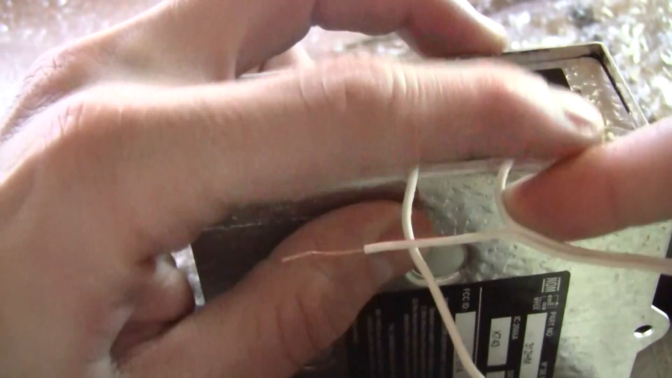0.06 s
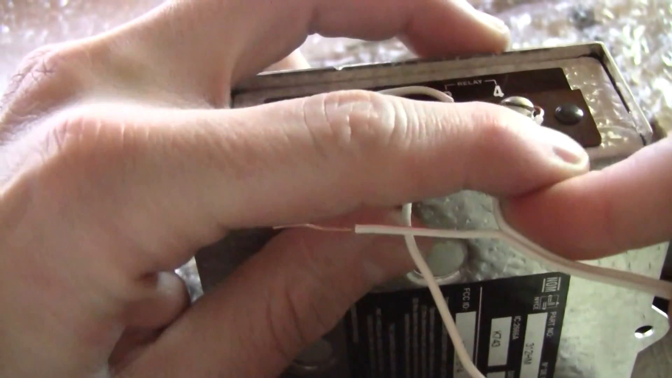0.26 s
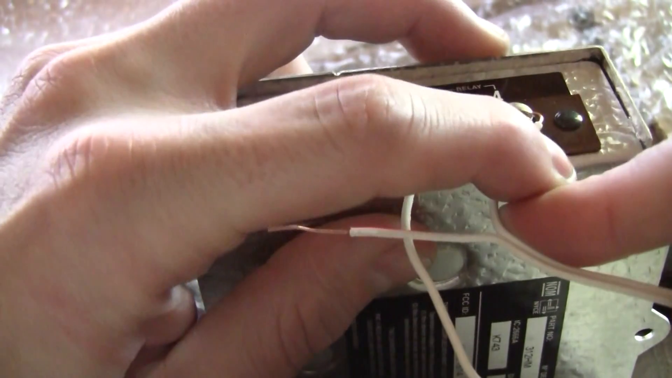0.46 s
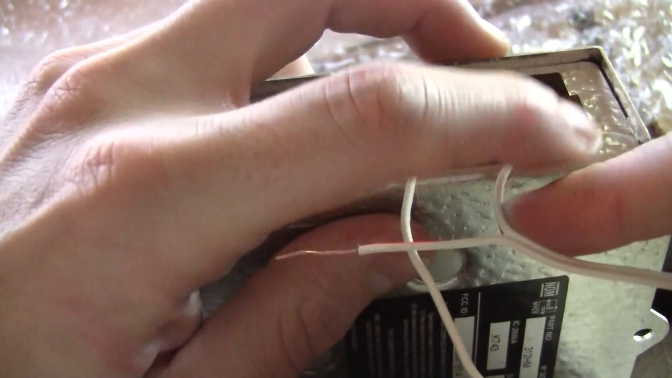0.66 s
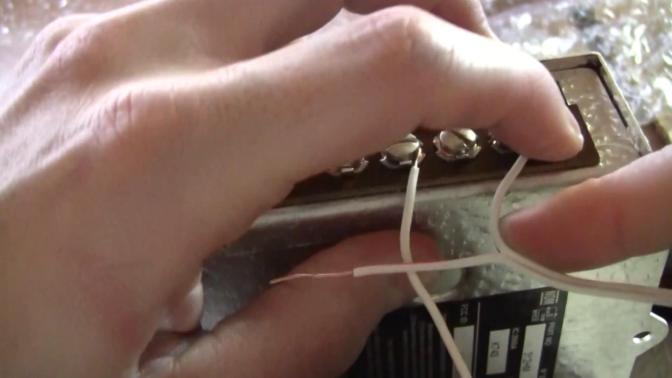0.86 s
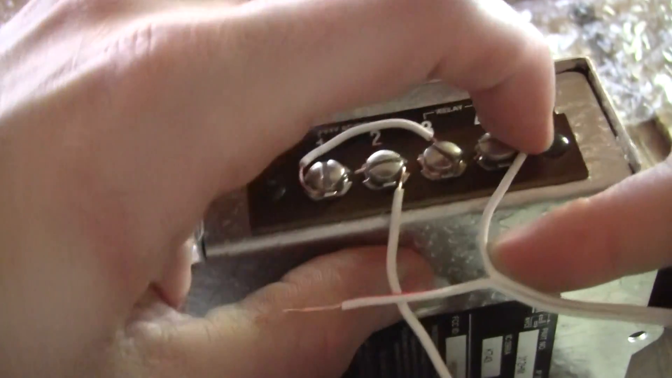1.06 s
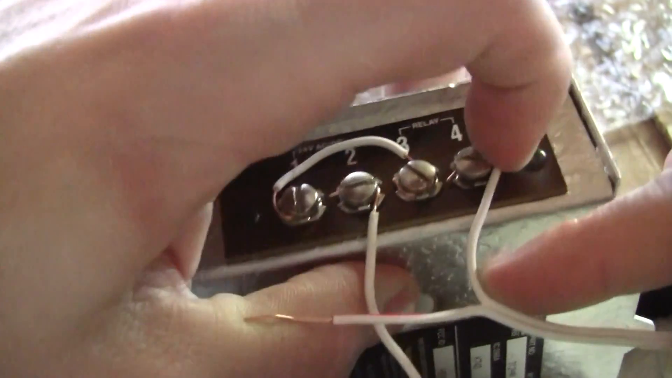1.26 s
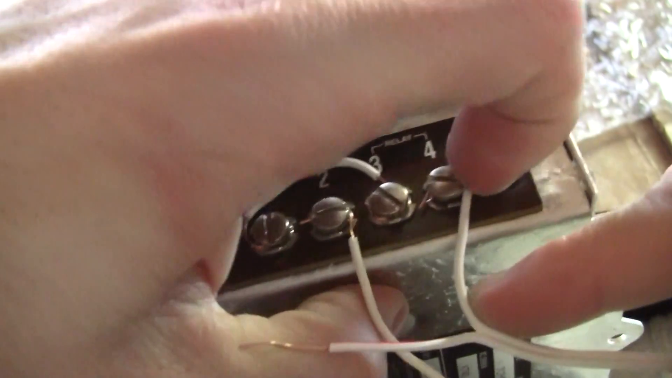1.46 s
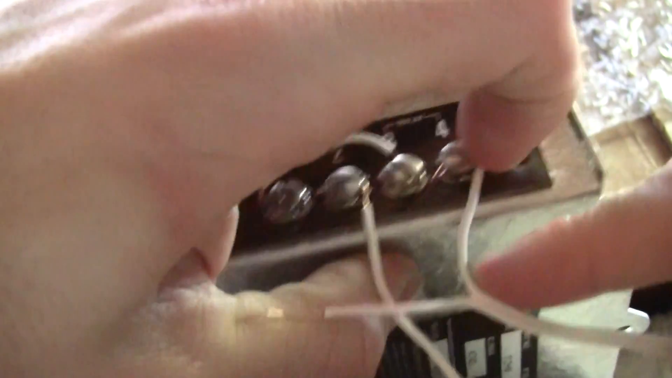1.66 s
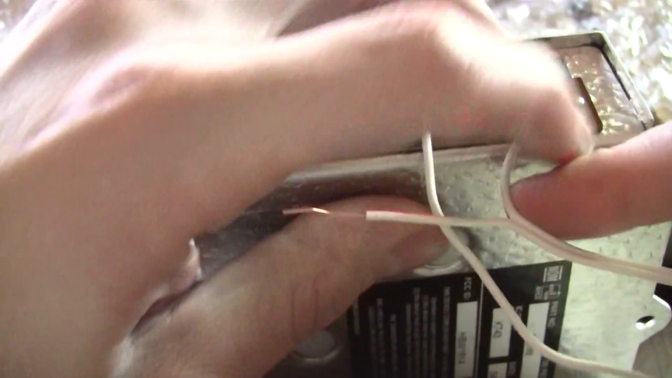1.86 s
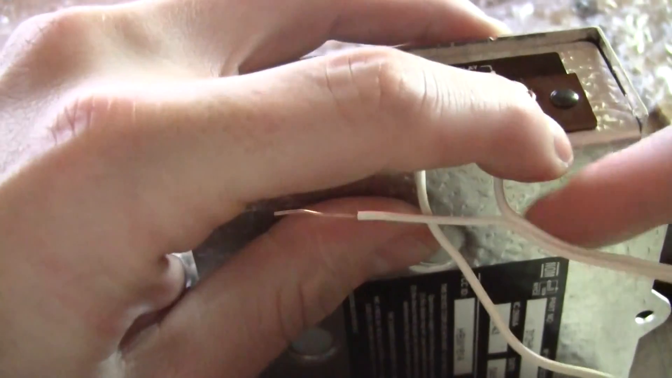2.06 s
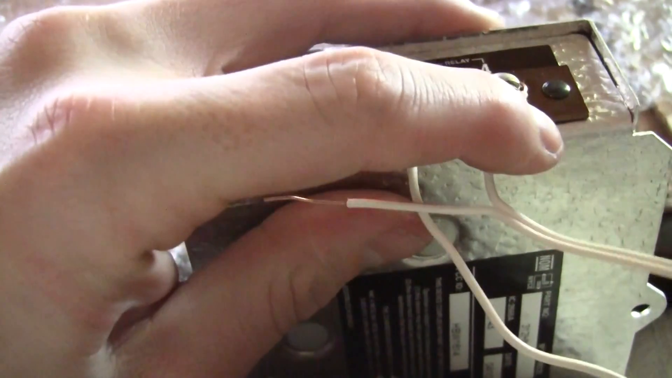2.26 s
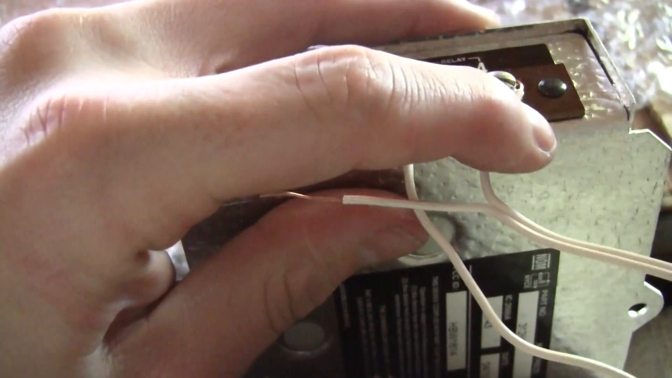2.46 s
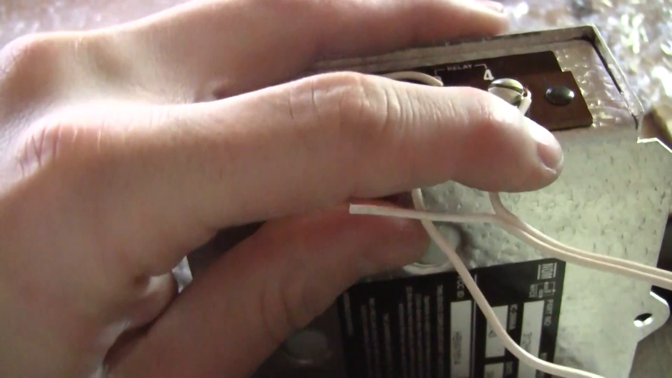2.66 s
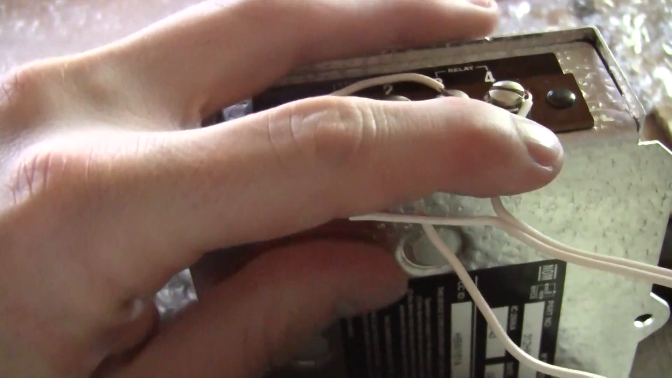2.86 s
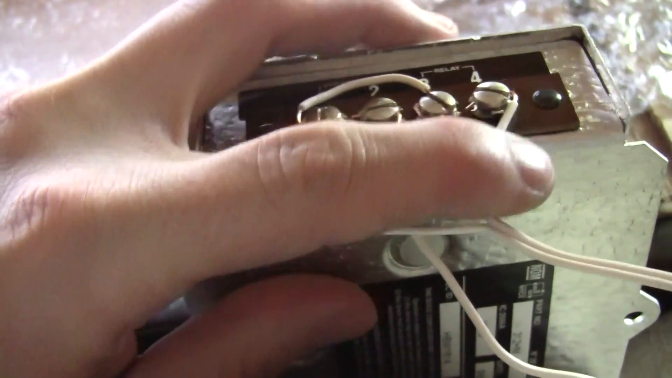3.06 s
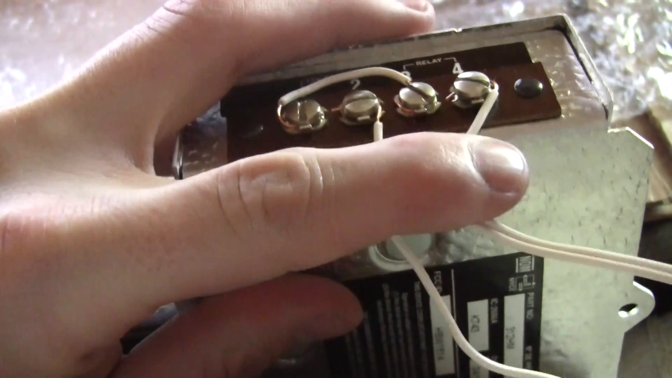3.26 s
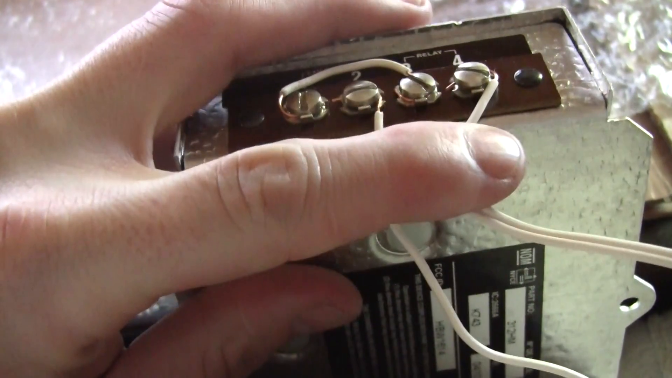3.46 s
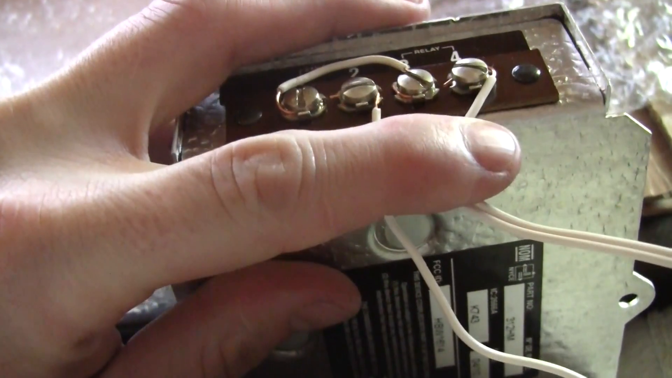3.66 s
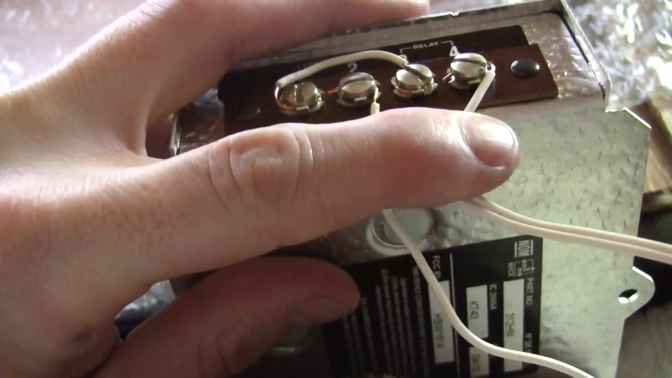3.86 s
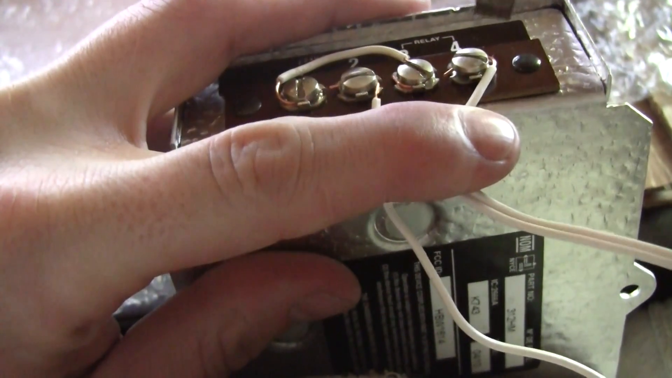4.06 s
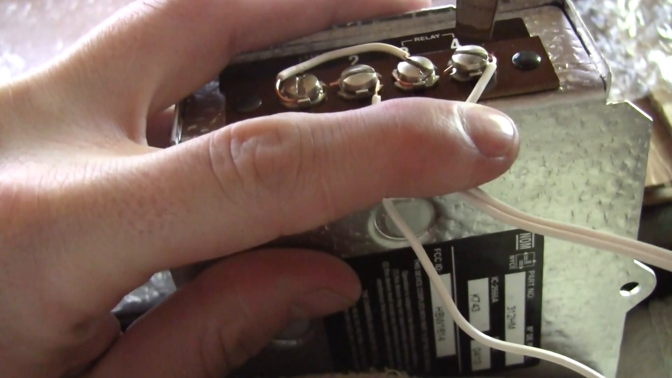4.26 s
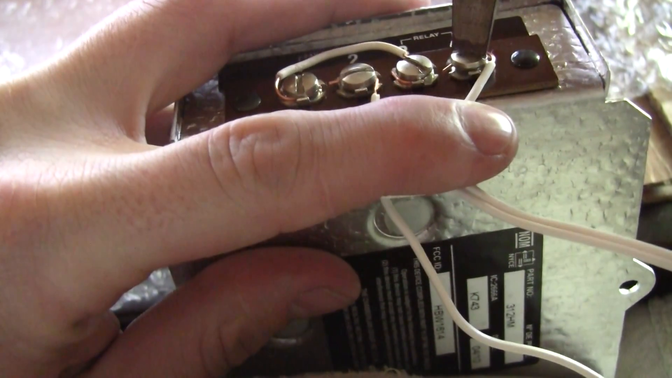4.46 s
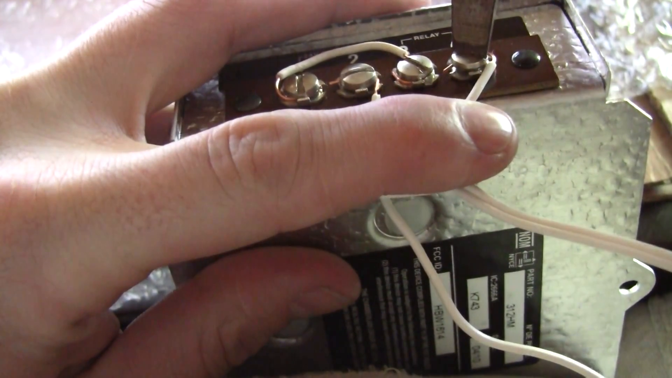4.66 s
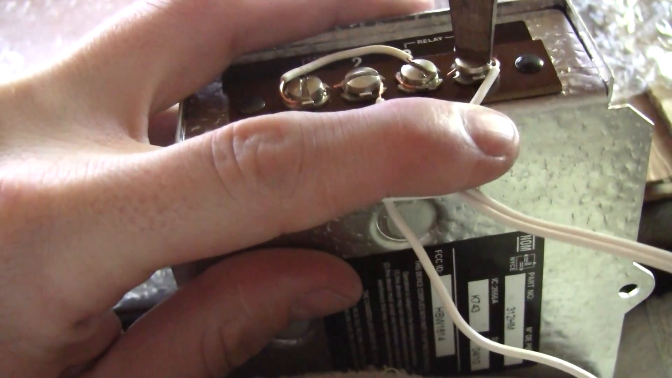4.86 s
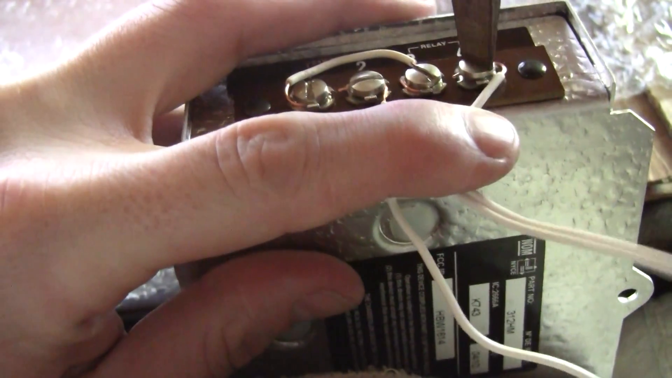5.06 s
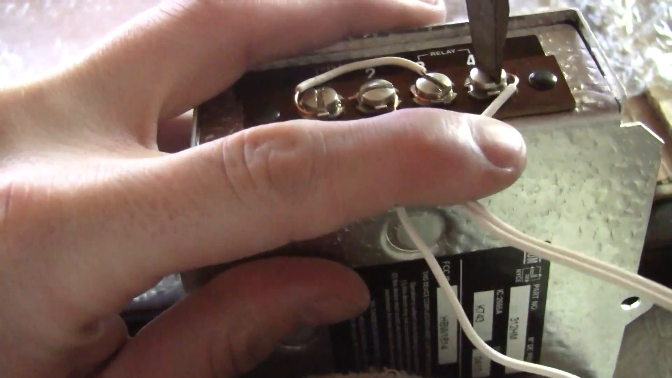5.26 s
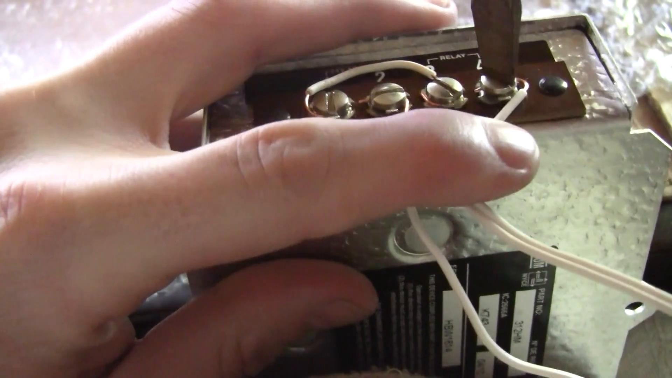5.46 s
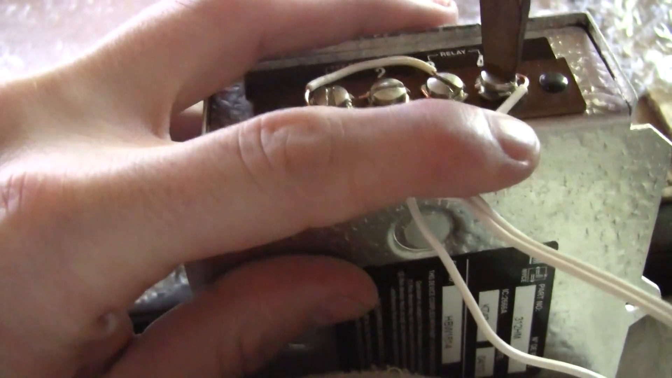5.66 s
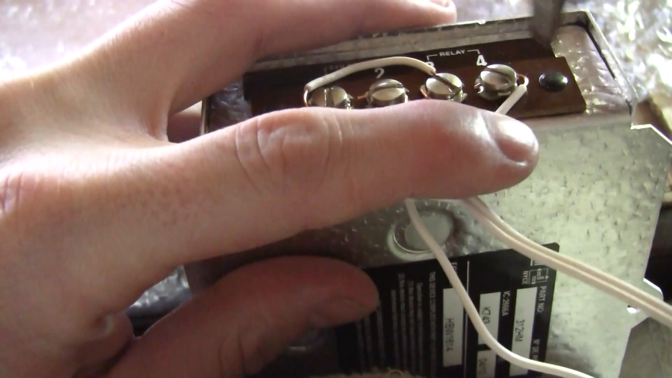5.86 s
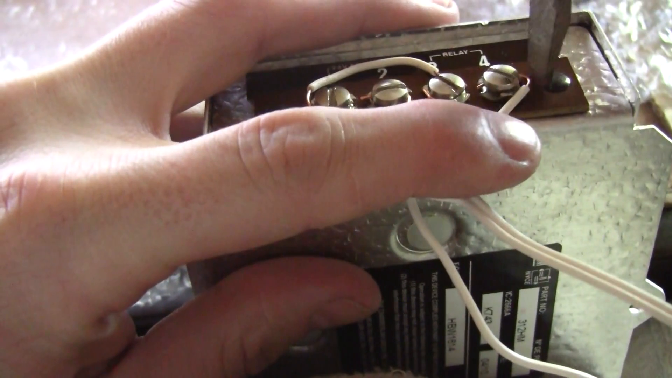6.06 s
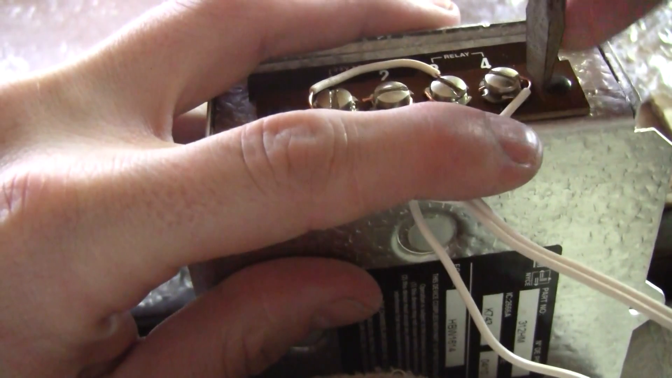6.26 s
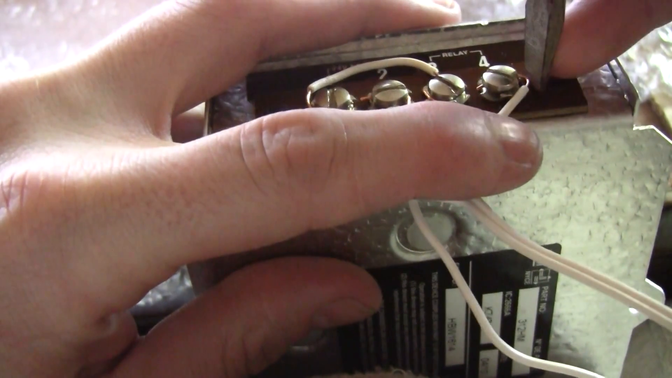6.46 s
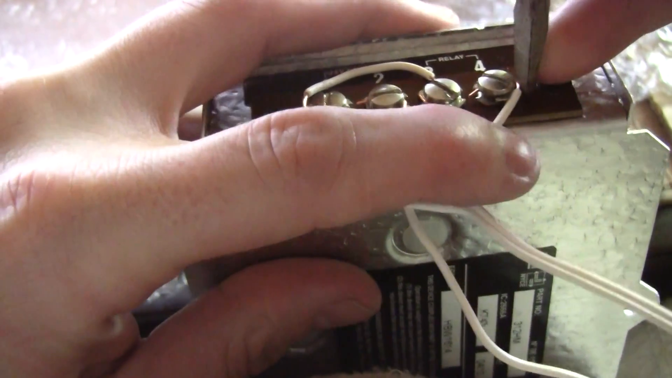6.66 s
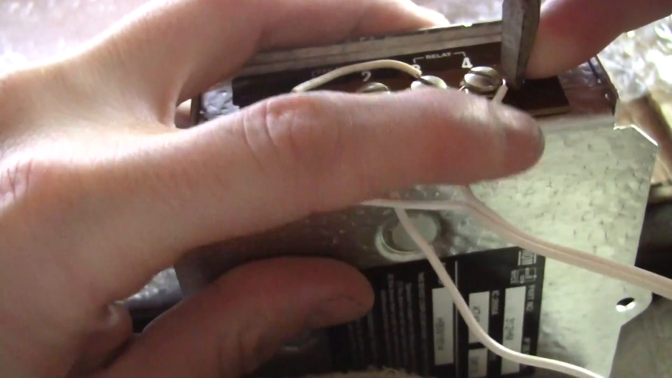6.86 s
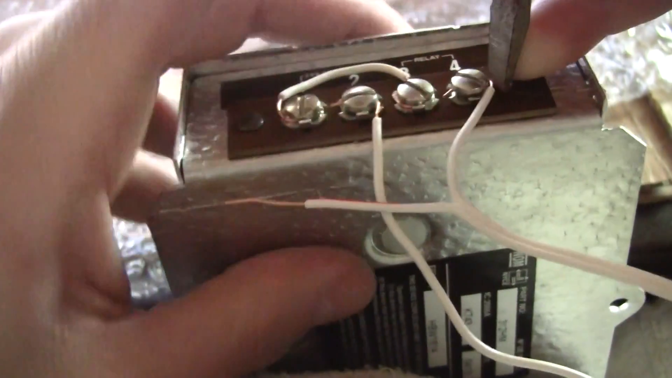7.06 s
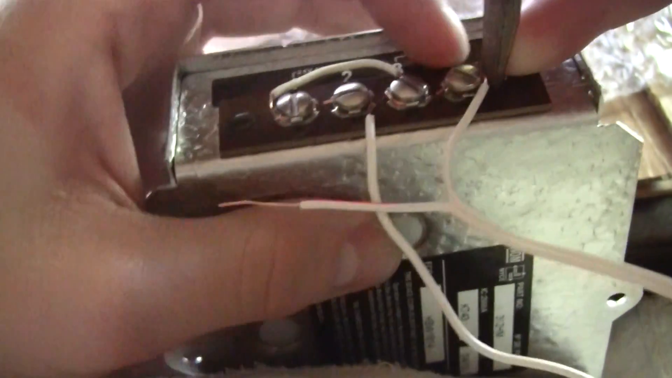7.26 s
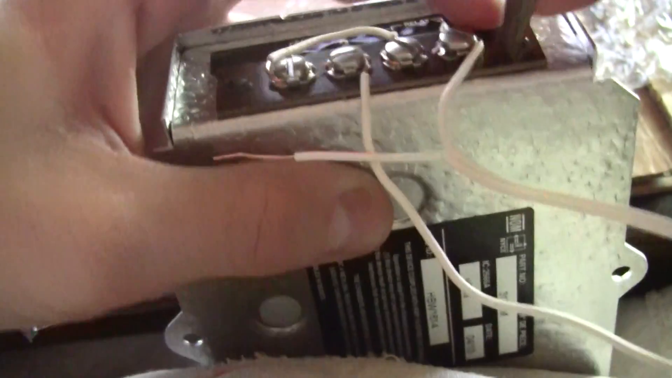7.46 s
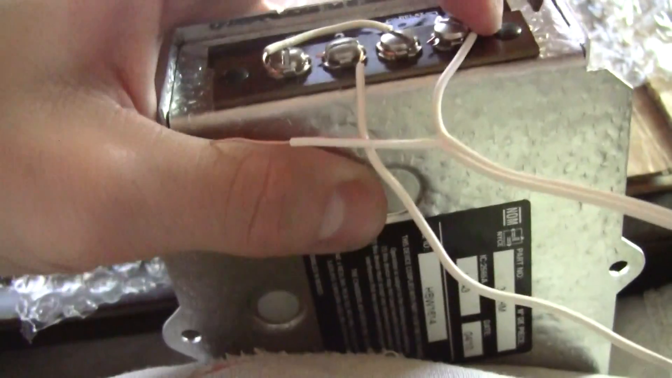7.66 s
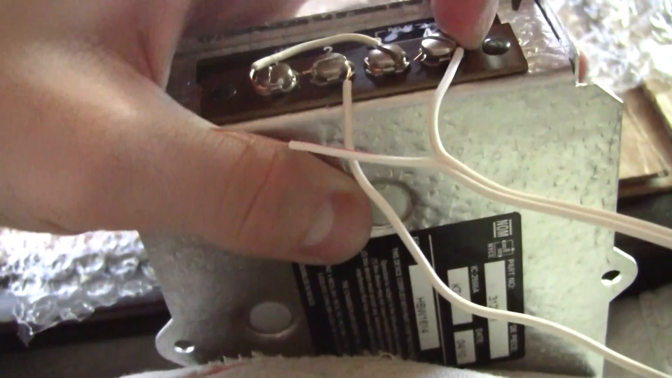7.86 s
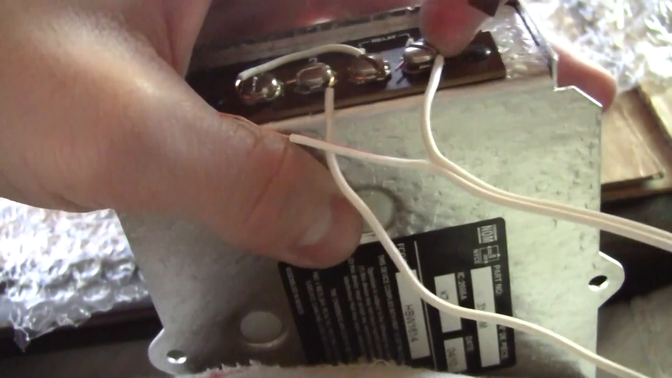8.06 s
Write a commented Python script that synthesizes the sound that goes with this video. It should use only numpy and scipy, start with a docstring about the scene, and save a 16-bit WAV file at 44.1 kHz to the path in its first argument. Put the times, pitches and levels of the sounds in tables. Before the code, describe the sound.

Close, dry metallic taps and scuffs as fingers, wire and a screwdriver work on a small metal box over soft room tone.

```python
"""Hands work thin wire onto the screw terminals of a sheet-metal box, close to a camera in a quiet room.
From the start there is steady room tone, shaped noise over a faint low rumble, and hands rest on the box.
Strokes then swell: the box drags on the bench, wire scrapes it and skin slides, as grains of uneven noise.
At once, and all the way through, fingers and a screwdriver knock the box: its panels ring briefly as
fading sine waves, and wire and blade tick on the screws. Now and then a drawn wire makes one part sing."""
import sys
import numpy as np
from scipy import signal
from scipy.fft import rfft, irfft
from scipy.io import wavfile
from scipy.ndimage import uniform_filter1d

SR = 44100
rng = np.random.default_rng(int(sys.argv[2]) if len(sys.argv) > 2 else 0)


def master(y):
    """Save y as 16-bit WAV."""
    cut = np.clip(np.atleast_2d(y).T, -1, 1)
    pcm = np.round(cut * 32767)  # scale
    wavfile.write(sys.argv[1], SR, pcm.astype(np.int16))


N = 358088
T = np.arange(int(0.4 * SR)) / SR  # time in seconds within one short sound
MID_SIDE = np.array([[1], [-1]])  # side noise is added on the left and subtracted on the right


def undb(db):
    """Turn decibels into a gain."""
    return 10 ** (np.asarray(db) / 20)


def level(x, db):
    """Scale a sound to an average (rms) level in dB."""
    return x * undb(db) / np.sqrt(np.mean(x ** 2))


def peak(x, db):
    """Scale a sound so that its highest point has this level in dB."""
    return x * undb(db) / np.max(np.abs(x))


def fade(t60):
    """Die away as ringing things do, 60 dB down after t60 seconds."""
    return np.exp(-np.log(1000) * T / t60)


def walk(rate):
    """Wander at random, rate new values per second joined by slopes, with a spread near 1."""
    hold = int(SR / rate)
    values = rng.standard_normal(N // hold + 1)
    return uniform_filter1d(np.repeat(values, hold), hold)[:N]


def coloured(x, *spectra):
    """Shape a sound's spectrum by (Hz, dB) points, joined along a log frequency axis."""
    log_hz = np.log(np.arange(N // 2 + 1) * SR / N + 1)
    db = 0
    for spectrum in spectra:
        points = np.array(spectrum)
        db = db + np.interp(log_hz, np.log(points[:, 0]), points[:, 1])
    return irfft(rfft(x) * undb(db), N)


def noise_burst(lo_hz, hi_hz, envelope):
    """Short noise with the given fading shape, passed through a steep band."""
    band = signal.butter(3, [lo_hz, hi_hz], "band", fs=SR, output="sos")
    return signal.sosfilt(band, rng.standard_normal(len(T)) * envelope)


def ring(modes, share=1.0, extra_db=0.0, detune=1.0):
    """A struck body: a sum of sine waves, one per way it vibrates, each dying away at its own pace."""
    hz, db, t60 = np.transpose(modes)
    waves = np.sin(2 * np.pi * (hz * detune)[:, None] * T)
    return undb(db + extra_db) @ (waves * fade(share * t60[:, None]))


def grit(scatter_db):
    """Friction as dense tiny slips: noise whose strength jumps about, both quickly and slowly."""
    return rng.standard_normal(N) * undb(scatter_db * walk(400) + 0.66 * walk(36))


# Colour of the room tone. Each row: frequency in Hz, relative strength in dB per Hz.
ROOM = [(12, -50), (20, -13), (48, -10), (77, -1.5), (107, -9.5), (216, -6.5), (255, -5.5), (319, -2.5),
        (388, -4), (558, -2.5), (780, -4.5), (1910, -15.5), (16000, -46)]
# How unlike left and right are. Each row: frequency in Hz, side noise minus middle noise in dB.
ROOM_SIDE = [(60, -16), (110, -8), (200, 2), (380, 3.5), (700, 2), (1290, 3), (2380, 2.5), (4400, 1.5),
             (8120, 2), (15000, 5)]
ROOM_DB = -55.5  # average level of the middle noise, around which it swells


def room():
    """Steady room tone and microphone hiss: shaped noise, swelling a little."""
    mid = coloured(rng.standard_normal(N), ROOM)
    side = coloured(rng.standard_normal(N), ROOM, ROOM_SIDE)
    gain = undb(ROOM_DB + 0.27 * walk(2.64)) / np.sqrt(np.mean(mid ** 2))
    return gain * (mid + side * MID_SIDE)


def bass():
    """A faint low rumble of the building: deep noise, mostly alike in both channels."""
    colour = [(20, 5), (32, 14), (50, 3), (85, 2), (130, -19), (300, -45)]  # Hz, relative dB
    mid = level(coloured(rng.standard_normal(N), colour), -77)
    side = level(coloured(rng.standard_normal(N), colour), -87)
    return mid + side * MID_SIDE


# Strokes of the hands. Each row: moment of most pressure in seconds, swell time in seconds,
# fade time in seconds, then the levels in dB of the box dragging, wire scraping the panels,
# wire rasping on the screws and skin sliding.
STROKES = [(0.055, 0.081, 0.11, -52, -62, -66.5, -73), (0.175, 0.035, .04, -53, -70, -74, -75),
           (0.284, 0.068, .08, -57, -61, -69, -78), (0.663, .03, 0.044, -59, -62, -69, -73),
           (0.823, .08, .1, -62, -58.5, -63, -85), (0.983, 0.053, 0.037, -47.5, -55, -63, -62),
           (1.152, 0.16, 0.12, -57, -56, -69.5, -76), (1.392, 0.11, .04, -53, -59, -72, -77),
           (1.532, 0.11, .05, -54, -60, -67, -81), (1.646, 0.024, 0.035, -46.5, -62, -80, -87),
           (1.75, 0.052, 0.25, -44, -54, -79, -80), (1.891, 0.11, 0.12, -40, -56, -82, -69),
           (2.0, 0.072, 0.28, -51, -59, -87, -89), (2.238, 0.014, 0.017, -49, -46, -56, -44),
           (2.549, 0.16, .15, -61, -70, -69, -70), (2.923, 0.12, 0.096, -61, -51, -57.5, -56.5),
           (3.1, .1, 0.19, -57, -59, -68, -76), (3.253, 0.05, 0.043, -58, -52, -58.5, -67),
           (3.357, 0.057, 0.049, -60, -60, -63, -77), (4.061, 0.36, .4, -70, -72, -75, -88),
           (4.59, .02, 0.18, -50.5, -72, -88, -93), (4.804, .1, 0.044, -55, -60, -74, -81),
           (5.034, .15, .05, -61, -65, -80, -77), (5.123, 0.024, .05, -49, -50.5, -74, -85),
           (5.268, .08, .2, -56.5, -66, -77, -86), (5.742, 0.064, 0.031, -55, -58, -73, -72),
           (5.81, .04, .12, -62.5, -71, -74, -79), (6.066, 0.018, .025, -62, -66, -60, -58.5),
           (6.136, 0.04, 0.051, -46.5, -50, -81, -82), (6.26, .12, 0.15, -48.5, -61, -86, -73),
           (6.585, .04, .08, -54.5, -64, -83, -89), (6.974, .07, 0.13, -66.5, -61, -64.5, -90),
           (7.139, 0.094, 0.092, -50, -55.5, -75, -58.5), (7.244, .05, 0.037, -62, -62, -62, -63),
           (7.33, 0.027, 0.23, -45.5, -62, -82, -80), (7.473, 0.038, .03, -37, -52, -75, -80),
           (7.538, .03, .04, -62, -54.5, -67, -77), (7.64, 0.088, 0.12, -44, -55, -77, -69),
           (7.772, .06, 0.073, -48, -62, -67, -69), (7.97, 0.13, 0.085, -47, -54, -59.5, -61),
           (8.117, 0.027, .03, -44.5, -49, -58, -57.5)]
# Hands resting on the box between strokes: levels in dB of the same four sounds, in that order.
RESTING_DB = [-67, -72.5, -75.5, -83]
# The same four in order: dB lost one swell or fade time away from the strongest moment.
EDGE_DB = [10.3, 9.4, 9.2, 13]
EDGE_POWER = 1.12  # 1 = pointed stroke, 2 = rounded
RESTING_SWAY_DB = 0.8


def pressure():
    """Loudness of the four friction sounds: strokes swell and fade over a restless resting contact."""
    t = np.arange(0, N, 64) / SR  # every 64th sample is enough for slow changes
    resting_db = np.array(RESTING_DB)[:, None] + RESTING_SWAY_DB * walk(14)[::64]
    power = undb(resting_db) ** 2
    for s, swell, fall, *db in STROKES:
        away = np.maximum((s - t) / swell, (t - s) / fall) ** EDGE_POWER
        stroke_db = np.array(db)[:, None] - np.outer(EDGE_DB, away)
        power = power + undb(stroke_db) ** 2
    return [np.interp(np.arange(N) / SR, t, np.sqrt(p)) for p in power]


def resound(modes, share, scatter_db, tilt_db=0.0):
    """Slips make a body ring; as the contact wanders, each mode swells and fades on its own."""
    out = 0
    for hz, db, t60 in modes:
        r = np.exp(-np.log(1000) / (share * t60 * SR))  # what is left of the ringing after one sample
        resonator = [1, -2 * r * np.cos(2 * np.pi * hz / SR), r * r]
        mode = signal.lfilter([1, 0, -1], resonator, grit(scatter_db))
        mode = level(mode, db + tilt_db * np.log2(hz))  # the tilt is in dB per octave
        out = out + mode * undb(4.0 * walk(12))
    return level(out, 0)


def hiss(colour, side_db):
    """Broad friction noise: shaped slips, partly unlike left and right."""
    mid = level(coloured(grit(2.0), colour), 0)
    side = level(coloured(grit(2.0), colour), side_db)
    return mid + side * MID_SIDE


# In the next four tables, each row: frequency in Hz, relative strength in dB,
# seconds to fall by 60 dB before the players below shorten it.
# The large panels of the box:
PANELS = [(460, -5.5, 0.15), (551, 5, 0.16), (603.7, 2, 0.24), (683, -5, 0.27), (747, 6, 0.11),
          (781, -0.5, 0.26), (803, 14, 0.061), (887, 0.5, 0.27), (1014, -23, 0.032), (1024, 4, 0.049),
          (1060, -21, 0.024)]
# Its short flanges and edges:
UPPER = [(1146, -3.5, 0.058), (1264, -4.5, 0.18), (1386, -4, 0.057), (1457, -3, 0.14), (1534, -7, 0.18),
         (1616, -5.5, 0.047), (1886, -1, .08), (2020, -6.5, 0.092), (1980, -43, 0.02), (2305, -23, 0.055)]
# The whole box rocking on the bench:
THUD = [(160, -18, 0.06), (269.8, 7, 0.17), (357, 10, 0.071)]
# The screws:
SCREWS = [(2440, 14.5, 0.02), (2950, -3.5, 0.029), (3750, -37.5, 0.022), (4330, -5, 0.034),
          (4300, -36.5, 0.02), (5600, -25, 0.04), (6430, -10, 0.055), (7200, -30, 0.088),
          (8400, -17, 0.044), (9000, -12, 0.018), (10090, -19, 0.017), (9840, -29, 0.025),
          (11500, -37.5, 0.035)]
# Colour of wire rasping on the screws. Each row: frequency in Hz, relative strength in dB per Hz.
RASP = [(1500, -6), (2400, 6.5), (3200, 5), (4500, -1), (6000, -5), (9000, -14.5)]
# Colour of skin sliding on metal. Each row: frequency in Hz, relative strength in dB per Hz.
SKIN = [(2350, -22), (4000, 4), (4840, -6), (6220, -4), (6860, 0.5), (9890, 3.5), (14700, -12.5),
        (16000, -27)]


def rubbing():
    """The box scuffs the bench, wire scrapes edges and screws, skin slides: slips ring metal or hiss."""
    drag, scrape, rasp, slide = pressure()
    box = resound(PANELS, 0.58, 2.4, -8) + undb(-12.5) * resound(THUD, 0.39, 2.5)
    edges = resound(UPPER, 0.25, 3.0, -6.0)
    wire_on_screws = hiss(RASP, -8.5) + undb(-18) * resound(SCREWS, 0.95, 1.5)
    skin = hiss(SKIN, -5.5)
    return drag * box + scrape * edges + rasp * wire_on_screws + slide * skin


# Knocks on the box. Each row: start in seconds, peak level in dB of the box sound;
# thud, clink and tick levels in dB against that peak; extra dB of the upper panels (the flanges and
# edges); dB of the added strong first swing; Hz of the most excited large panel, Hz of the most
# excited upper panel; share of the free ring length that the grip allows.
KNOCKS = [(0.007, -21.5, -18.5, -38, -35, -23, 7, 805, 1230, 0.75),
          (0.189, -40, -32, -17, -18, -4, 0, 790, 1490, .54),
          (0.453, -37, -25, -33, -33, -16, 0, 840, 1530, .35),
          (0.654, -40, -17, -14, -17, -2, -2, 544, 1500, 0.73),
          (0.979, -33.5, -32, -7, -11, 7, -2, 850, 1390, .6),
          (1.327, -35.5, -25, -9, -2, 26, 11, 794, 1930, 0.92),
          (1.529, -37.5, -18, -2.5, -17, 2, -9, 800, 1610, .76),
          (1.64, -35, -22, -33, -33, -10, -4, 719, 1280, 0.45),
          (1.713, -30, -25, -30, -39, -10, -3, 710, 1210, 0.91),
          (1.754, -31, -23, -28, -33, -2, 0, 805, 1250, 0.56),
          (1.767, -31, -18, -19, -29, -1, 0, 786, 1310, 0.65),
          (1.828, -3.5, -24, -22, -60, 14, 12, 770, 1296, 0.76),
          (2.044, -33.5, -35, -20, -18, 0, -2, 713, 1200, 0.52),
          (2.186, -21, -46, -11, -12.5, 4.5, -8, 840, 1220, 0.66),
          (2.225, -22.5, -39, -16, -15, -4, 0, 760, 1500, .95),
          (2.243, -18, -44, -17, -11.5, -12, 2, 725, 1230, .79),
          (2.504, -31, -25, -24, -25, -22, 6, 603, 1520, 0.36),
          (2.557, -27, -28, -17, -34, -12, 5, 890, 1520, 0.32),
          (2.634, -36, -33, -28, -21, -10, -7, 789, 1510, .45),
          (2.909, -37, -38, -9, -12, 19, 0, 840, 1440, 0.54),
          (3.069, -40.5, -17, -21, -31, -12, 0, 830, 1150, .6),
          (3.082, -34.5, -38, -31, -31, -19, 2, 886, 1530, 0.38),
          (3.586, -28.5, -36, -16.5, -45, -16, 8, 865, 1270, 0.95),
          (3.709, -36, -25, -27, -36, -8, 2, 810, 1180, .95),
          (3.833, -32.5, -30, 6.5, 3, 38, -10, 1040, 1770, 0.28),
          (3.989, -37.5, -17, -15, -29, 0, 5, 800, 1170, 0.51),
          (4.517, -19.5, -31, -22.5, -20, -5, 4, 890, 1650, 0.74),
          (4.525, -14, -24.5, -38, -33, 5, 11, 780, 1220, 0.6),
          (4.807, -18, -40, -34, -37, -34, 3.5, 570, 1460, 0.58),
          (4.942, -38, -39, -32, -30, -8, -2, 670, 1170, 0.32),
          (5.11, -32.5, -36, -9, -35, 12, 0, 912, 1820, 0.44),
          (5.13, -37, -34, -25, -29, 0, 0, 775, 1420, .69),
          (5.267, -25, -21, -44, -47, 12, -3, 1090, 1270, 0.56),
          (5.279, -29.5, -9, -35, -39, -13, 0, 802, 1450, 0.2),
          (5.721, -24.5, -41, -39, -36, -10, -5, 800, 1520, 0.79),
          (5.734, -29.5, -20, -18, -20, -4, 8, 910, 1440, 0.73),
          (5.742, -26, -32, -16, -22, 17, 3, 930, 1550, 0.52),
          (6.024, -6, -39, -10, -14, 11.5, 4, 870, 1880, 0.82),
          (6.035, -10.5, -39, -39, -41, -19, -10, 650, 1360, 0.86),
          (6.043, -17.5, -29, -37, -41, -9, -6, 533, 1440, .98),
          (6.075, -17.5, -20, -50, -37, -8, -4, 770, 1860, 0.4),
          (6.152, -14, -53, -50, -31, -29, 3, 540, 1216, .83),
          (6.282, -25.5, -44, -48, -37, -20, -5, 810, 1180, 0.6),
          (6.588, -40, -37, -28, -33, -10, -5, 853, 1500, .75),
          (6.644, -27.5, -31, -30, -37, 11, -4, 840, 1430, 0.82),
          (6.666, -28.5, -42, 5, 2.5, 22, 6, 837, 1400, 0.48),
          (6.93, -38.5, -15, -17, -33, 6, -2, 797, 1180, 0.28),
          (7.018, -36.5, -14, -15, -31, -1, 3, 789, 1400, 0.51),
          (7.14, -38.5, -17, -41, -11, 6, 7, 789, 1160, 0.47),
          (7.277, -7.5, -20.5, -28.5, -50, -16, 6.5, 763, 1360, 0.9),
          (7.377, -30.5, -17, -38, -31, -11, 5, 890, 1200, 0.84),
          (7.448, -32, -46, -39, -32, -9, -7, 790, 1540, 1),
          (7.494, -14.5, -34, -10.5, -12, 12, 8, 800, 1300, .98),
          (7.61, -18.5, -37, -41, -28, -24, -4, 746, 1180, .73),
          (7.624, -12, -17, -53, -37, -34, 2, 667, 1120, 0.55),
          (7.97, -36, -9, -8, -23, -2, -7, 746, 1410, 0.39)]
CONTACT_S = 0.0014  # rise of the push in seconds
# Left minus right in dB; the last is for clicks straight on the far screw.
BODY_PAN_DB, BRIGHT_PAN_DB, BLADE_PAN_DB = 0.4, 2.7, -6


def knocks():
    """Each blow rings the panels near its spot most, rocks the box, clinks the screws and ticks."""
    out = np.zeros((2, N + len(T)))
    low_cut = signal.butter(3, 400, "high", fs=SR, output="sos")
    body = np.array(PANELS + UPPER)
    large = np.arange(len(body)) < len(PANELS)
    push = np.minimum(T / CONTACT_S, 1)
    sides = np.array([[0.5], [-0.5]])  # half of each pan up on the left, half down on the right
    for s, db, thud_db, clink_db, tick_db, upper_db, swing_db, spot_hz, upper_hz, share in KNOCKS:
        # modes far from the most excited one get less of the blow
        octaves = np.abs(np.log2(body[:, 0] / np.where(large, spot_hz, upper_hz)))
        spot_db = -12 * octaves + np.where(large, 0, upper_db)
        spot_db = spot_db + 3 * rng.standard_normal(len(body))
        detune = 1 + 0.012 * rng.standard_normal(len(body))
        # the modes start together as a blow; the hand damps most of it at once
        panels = ring(body, share, spot_db, detune) * (1 + undb(swing_db) * fade(0.04))

        # loose parts rattle on after the blow
        rattle = noise_burst(535, upper_hz, fade(0.071 * share) + undb(-24) * fade(0.3))
        # the ringing panels and their rattle carry little below 400 Hz
        centre = signal.sosfilt(low_cut, push * (peak(panels, 0) + peak(rattle, -10)))
        thud = peak(ring(THUD, 0.8 * share), thud_db)
        centre = peak(centre + push * thud, 0)

        crack = noise_burst(1470, 4320, fade(0.0071) + undb(-25) * fade(0.063))
        screws = ring(SCREWS, 0.6, 5 * rng.standard_normal(len(SCREWS)))
        clink = undb(clink_db) * (peak(crack, 0) + peak(screws, -4.5))
        tick = noise_burst(5470, 10640, fade(0.008) + undb(-20) * fade(0.057))
        tick = tick + undb(-9.0) * noise_burst(13000, 15300, fade(0.0028))
        bright = clink + peak(tick, tick_db)

        # a clink louder than the box is a click straight on the far screw
        pan_db = BLADE_PAN_DB if clink_db > 0 else BRIGHT_PAN_DB
        blow = centre * undb(sides * BODY_PAN_DB) + bright * undb(sides * pan_db)
        i = int(s * SR)
        out[:, i:i + len(T)] += undb(db) * blow
    return out[:, :N]


# Wire drawn across a screw or edge makes one part sing. Each row: start in seconds,
# length of the stroke in seconds, frequency in Hz, seconds to fall by 60 dB, level in dB.
SINGS = [(0.018, .058, 8800, .02, -75), (0.97, .028, 10000, .02, -65), (1.06, .037, 1790, .037, -58.5),
         (2.223, 0.034, 4300, 0.03, -45), (2.223, 0.028, 5500, .02, -52), (2.239, .015, 3090, 0.096, -49.5),
         (2.24, 0.033, 1506, 0.072, -41.5), (2.87, 0.093, 6100, .02, -68), (2.88, .087, 9600, .02, -62),
         (2.89, 0.03, 1420, .055, -55), (3.187, 0.09, 4200, .025, -63), (6.022, .0074, 8300, .04, -44),
         (6.091, 0.28, 554, 0.11, -51.5), (7.45, 0.06, 1534, 0.047, -43), (7.452, 0.026, 1950, .035, -47),
         (7.494, 0.016, 1935, .044, -30), (7.501, .012, 1535, .06, -35), (7.509, 0.026, 1220, 0.056, -39.5),
         (7.763, .34, 4230, 0.019, -67.5), (7.8, 0.25, 5500, .015, -74), (7.9, .14, 9950, .02, -67),
         (7.899, 0.15, 7550, .02, -71), (7.903, .12, 2730, .03, -67), (7.921, 0.15, 1280, 0.087, -58.5)]


def singing():
    """Short runs of uneven slips, each making a single mode ring."""
    out = np.zeros(N + 2 * len(T))
    slips = grit(1.6)
    for s, length, hz, t60, db in SINGS:
        stroke = np.sin(np.pi * np.clip(T / length, 0, 1)) ** 0.5
        run = slips[rng.integers(N - len(T)):][:len(T)]
        tone = signal.fftconvolve(run * stroke, ring([(hz, 0, t60)]))
        loudness = np.sqrt(np.sum(tone ** 2) / (length * SR))  # all its energy, over the stroke's length
        i = int(s * SR)
        out[i:i + len(tone)] += tone * undb(db) / loudness
    return out[:N]


def scene():
    """All sources sound together in the air."""
    return room() + bass() + rubbing() + knocks() + singing()


TOP_HZ = 15650  # highest frequency that the camera lets through


def record(dry):
    """The microphones drop the deep bass of near blows; the camera cuts the top."""
    bass_cut = signal.butter(2, 110, "high", fs=SR, output="sos")
    top_cut = signal.ellip(8, 0.2, 70, TOP_HZ, fs=SR, output="sos")
    return signal.sosfilt(top_cut, signal.sosfilt(bass_cut, dry))


dry = scene()
out = record(dry)
master(out)
```